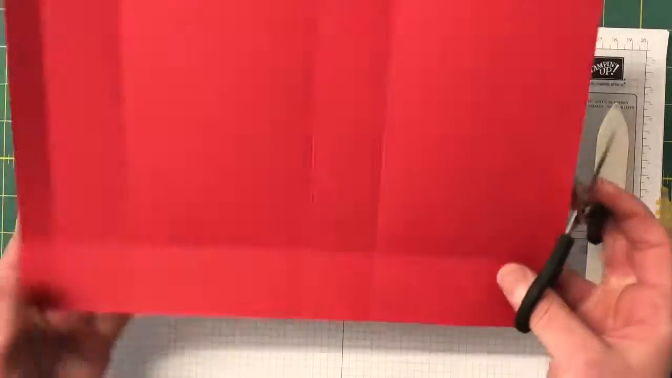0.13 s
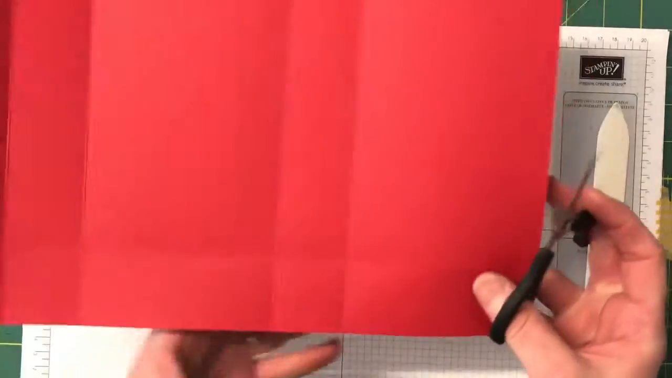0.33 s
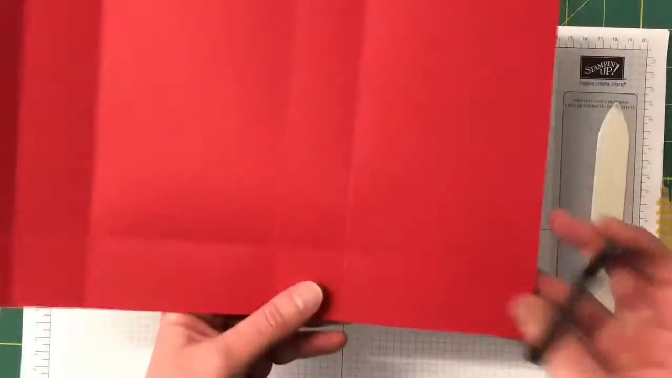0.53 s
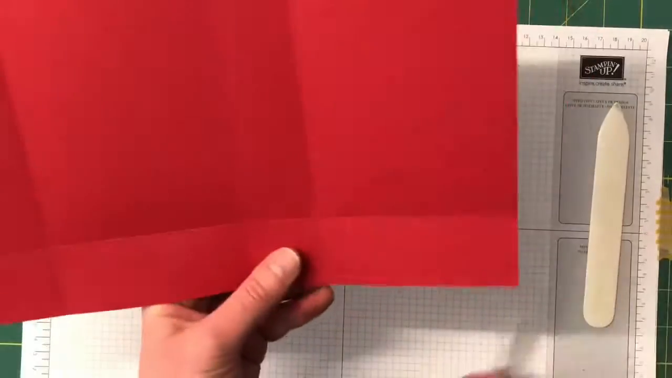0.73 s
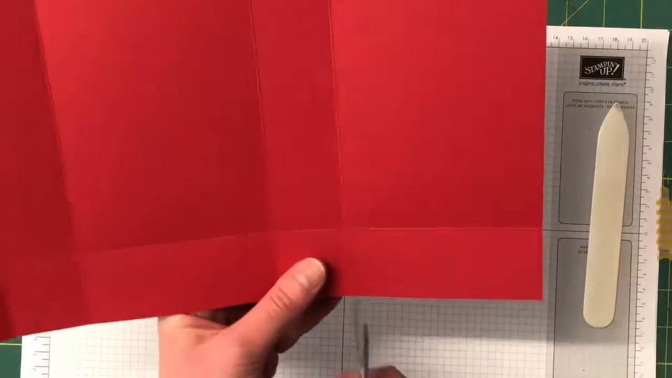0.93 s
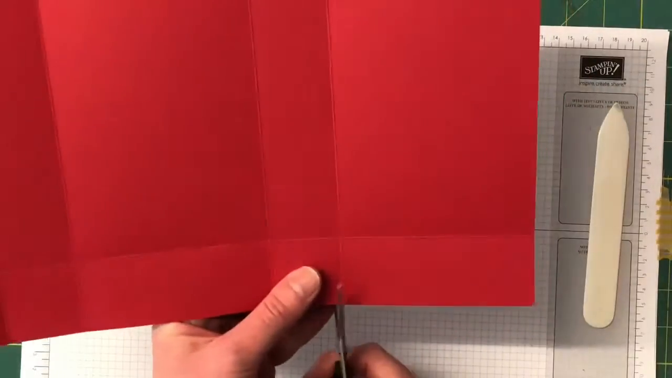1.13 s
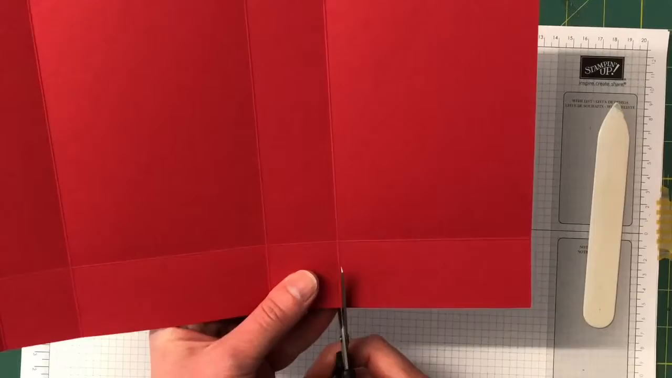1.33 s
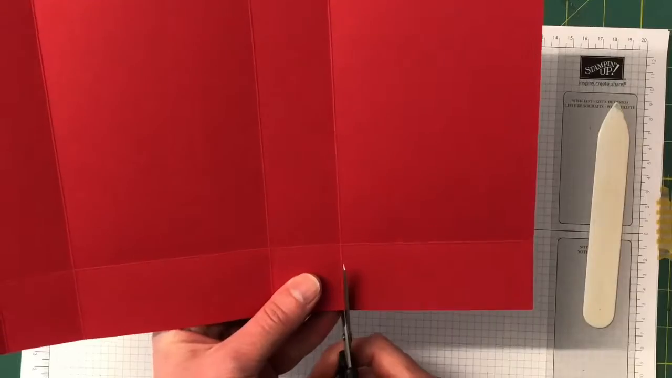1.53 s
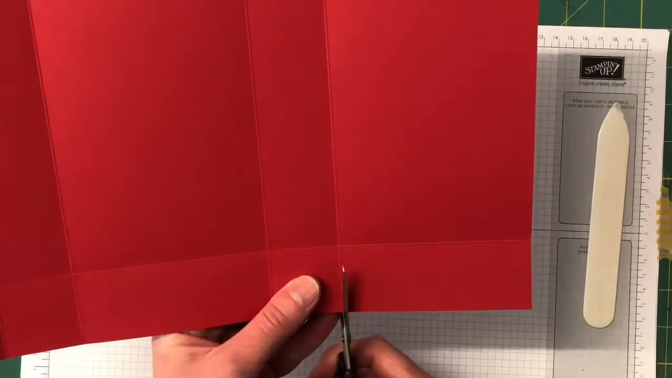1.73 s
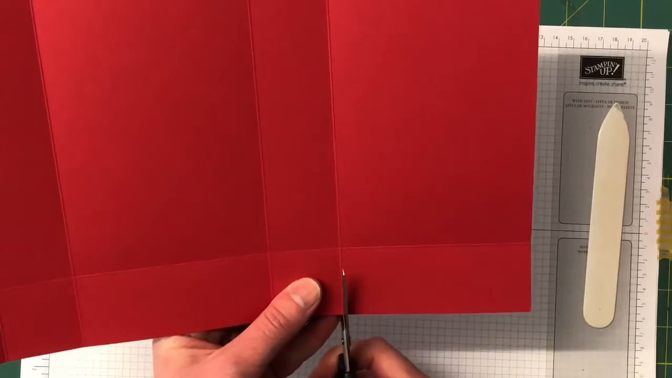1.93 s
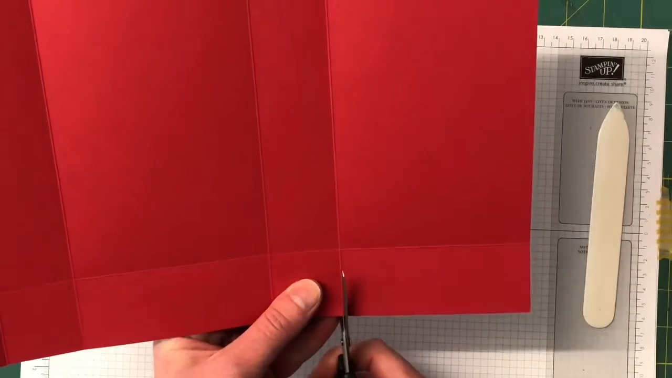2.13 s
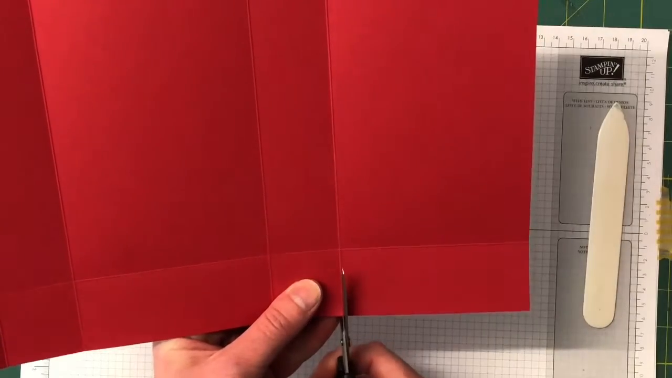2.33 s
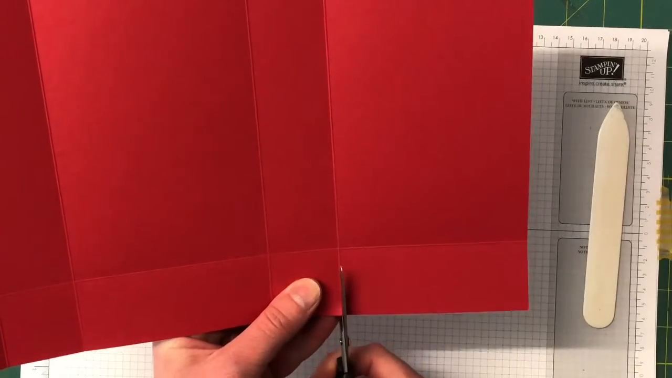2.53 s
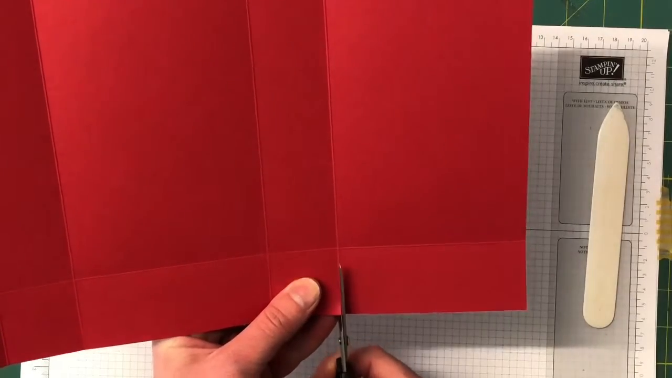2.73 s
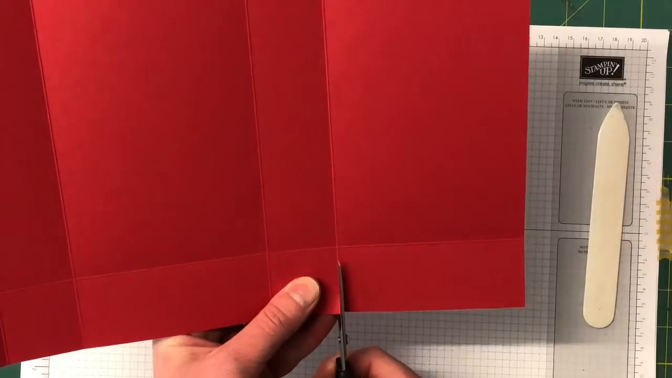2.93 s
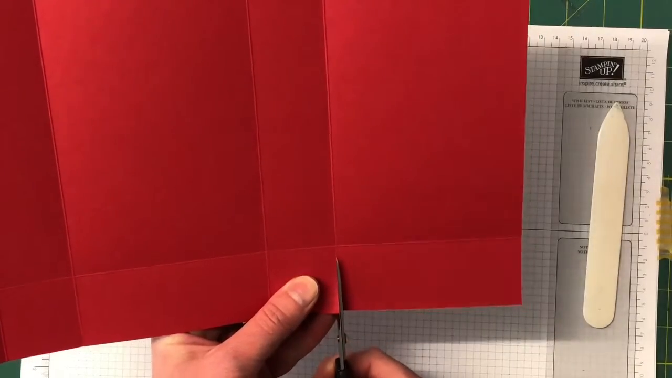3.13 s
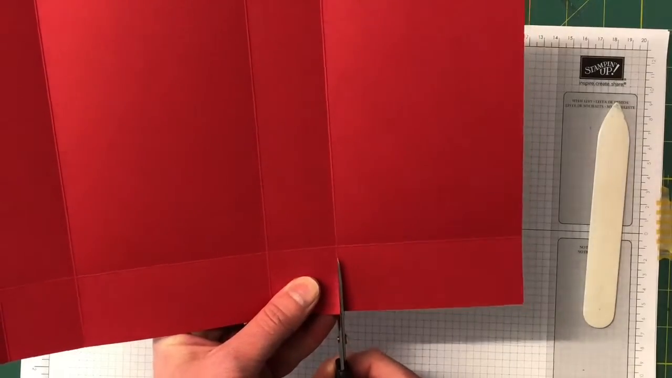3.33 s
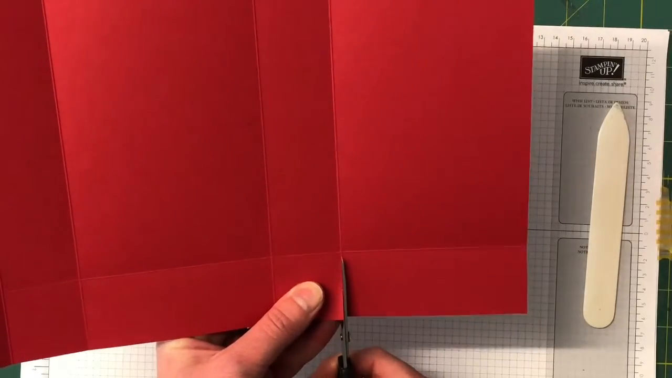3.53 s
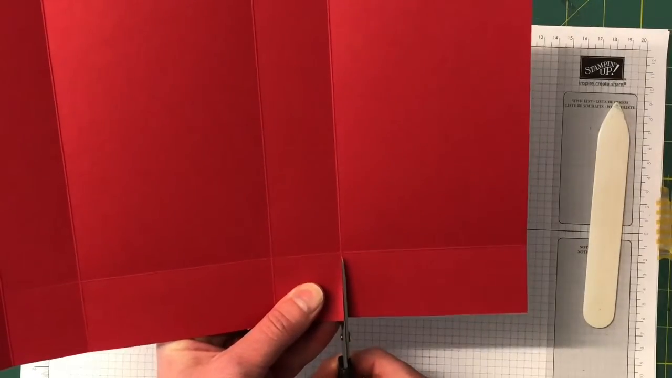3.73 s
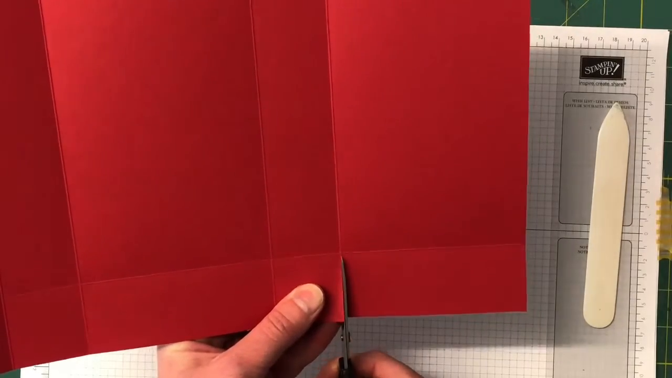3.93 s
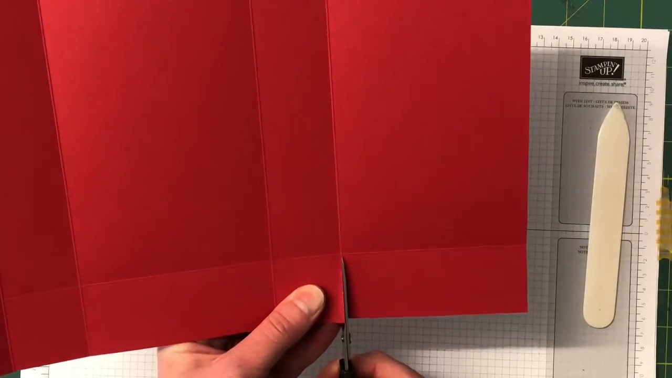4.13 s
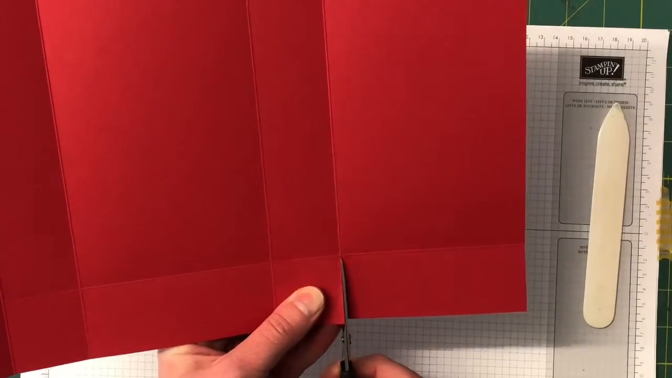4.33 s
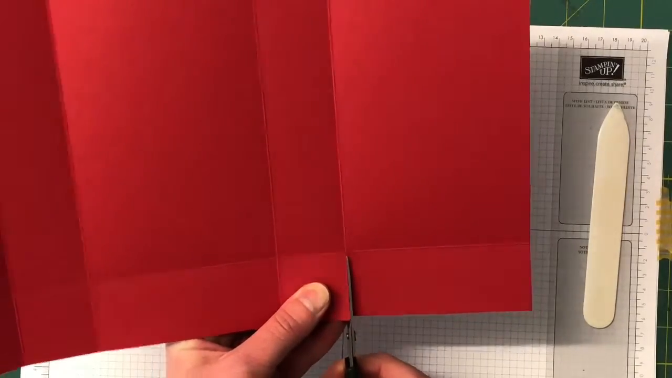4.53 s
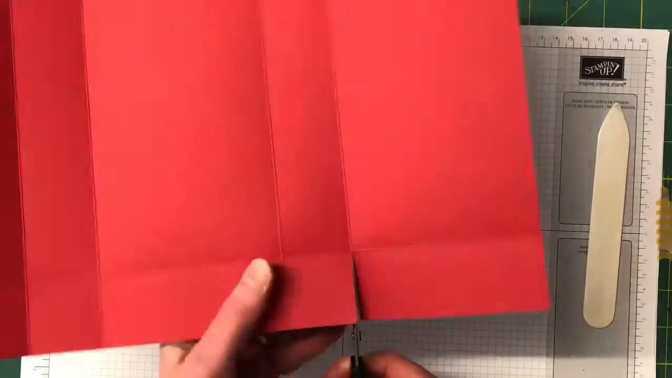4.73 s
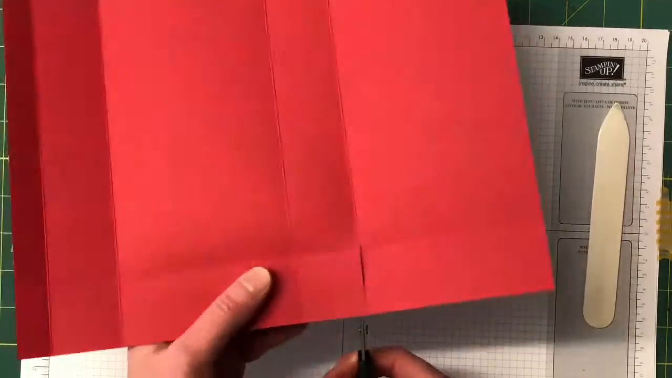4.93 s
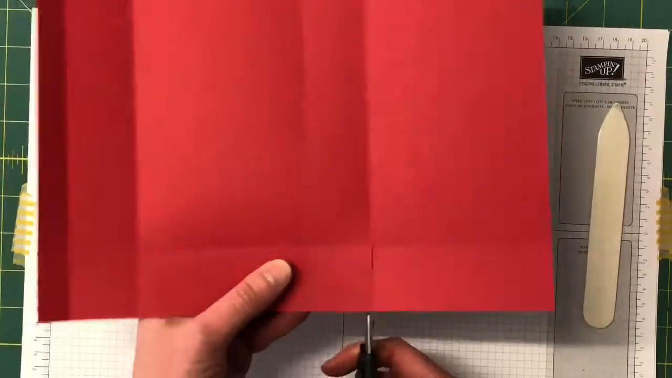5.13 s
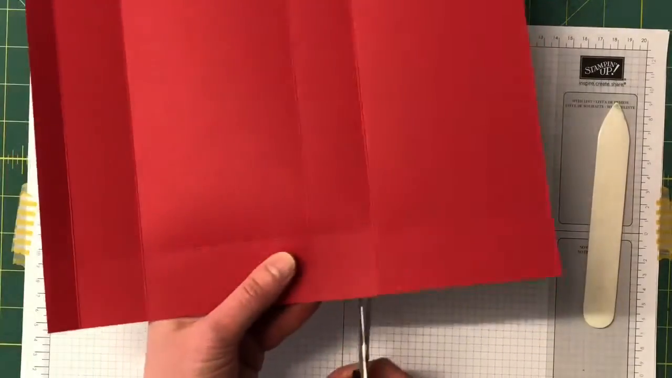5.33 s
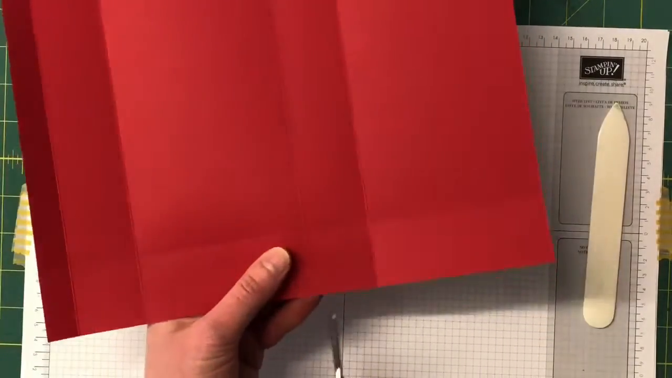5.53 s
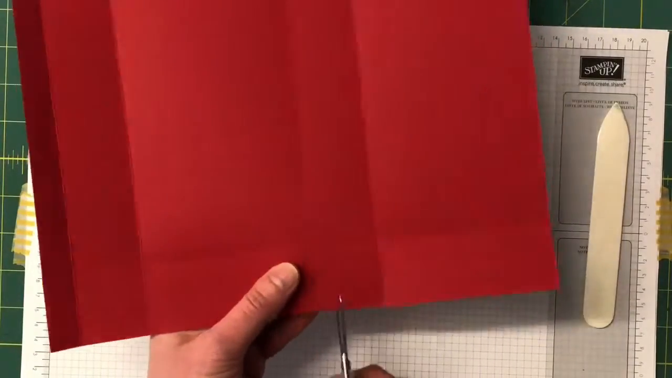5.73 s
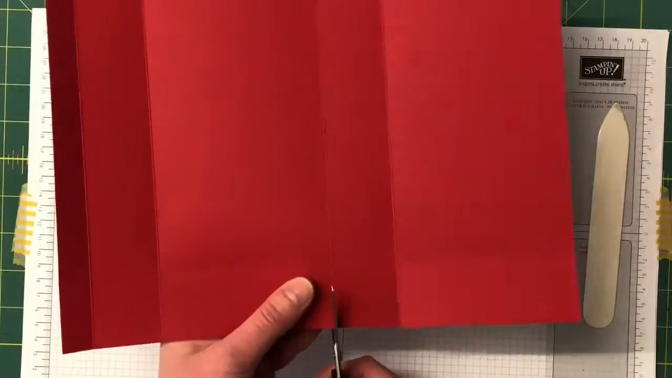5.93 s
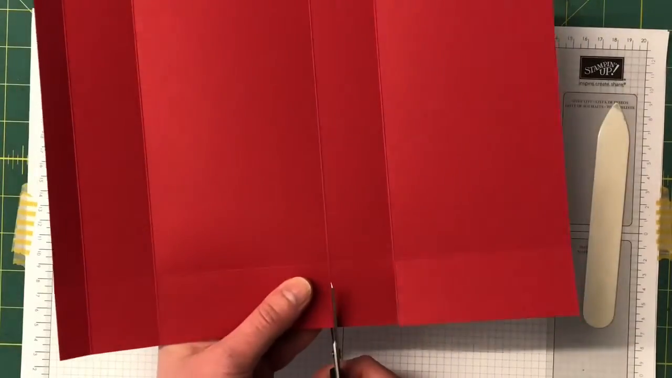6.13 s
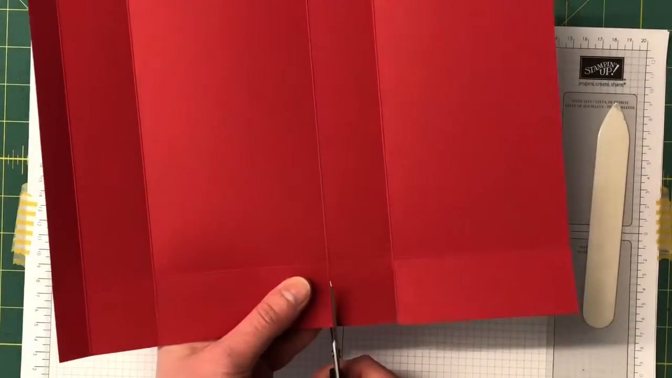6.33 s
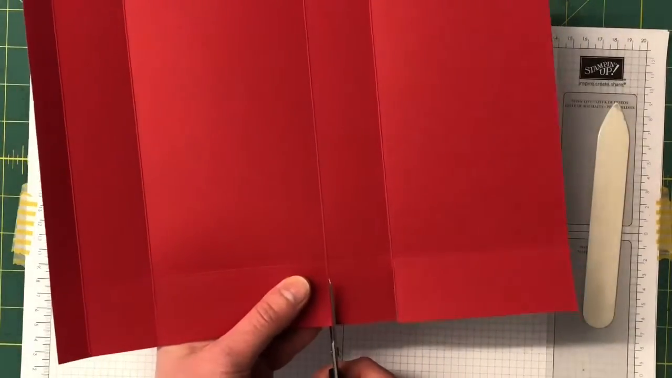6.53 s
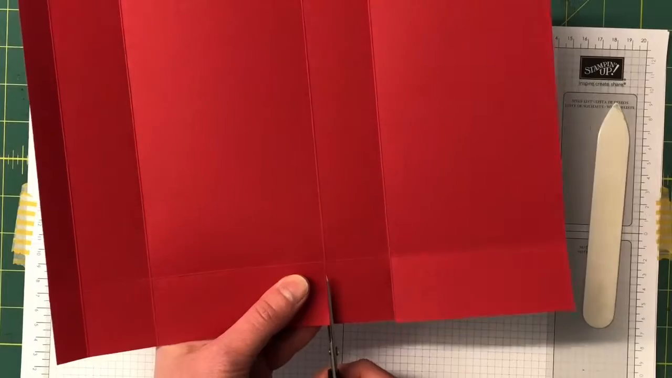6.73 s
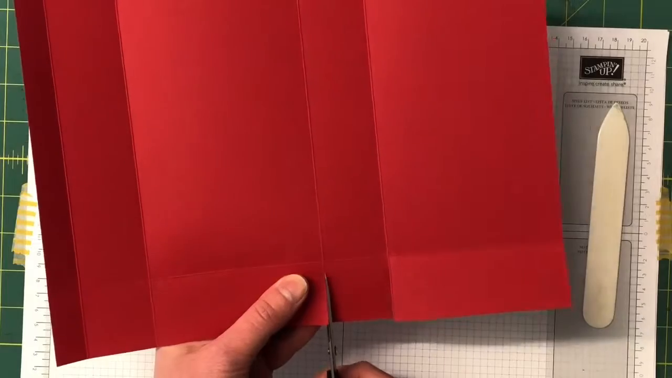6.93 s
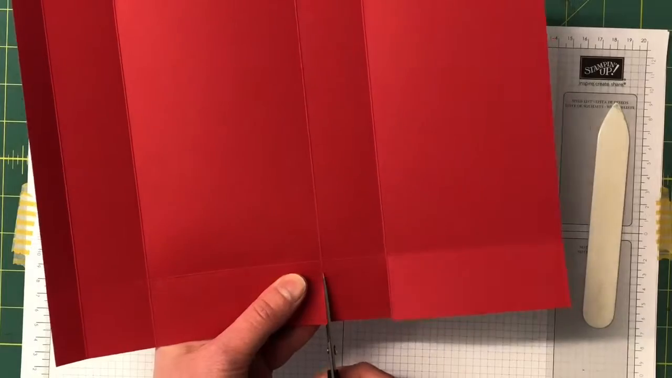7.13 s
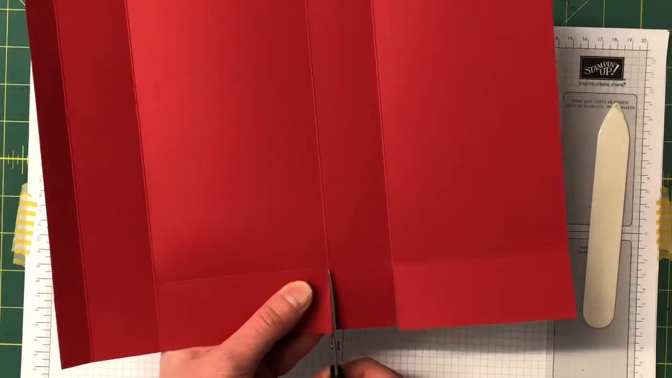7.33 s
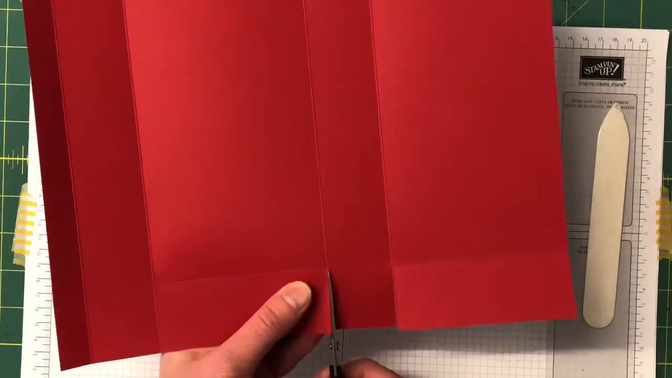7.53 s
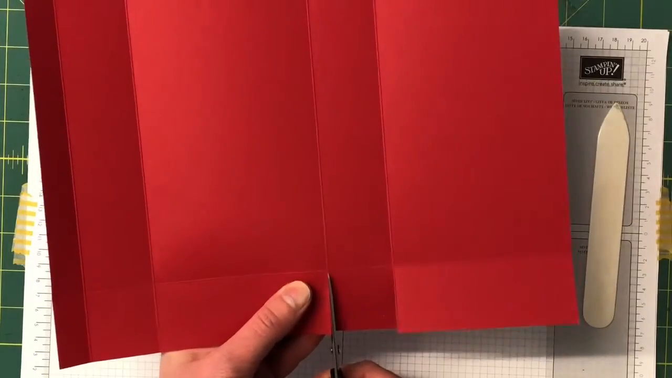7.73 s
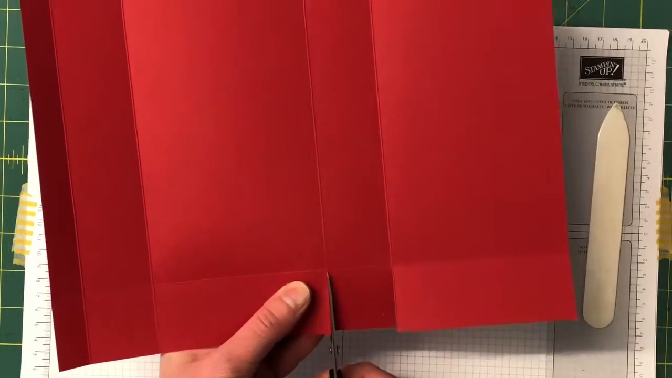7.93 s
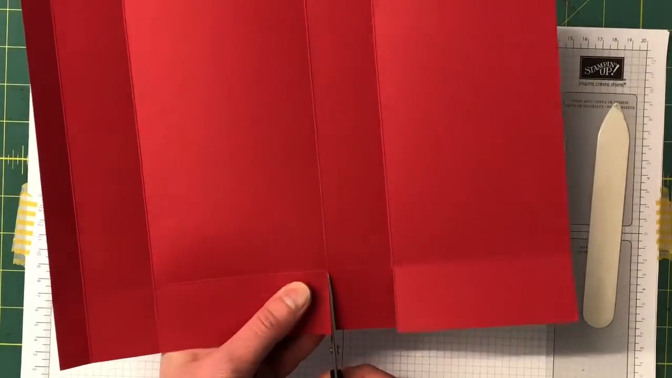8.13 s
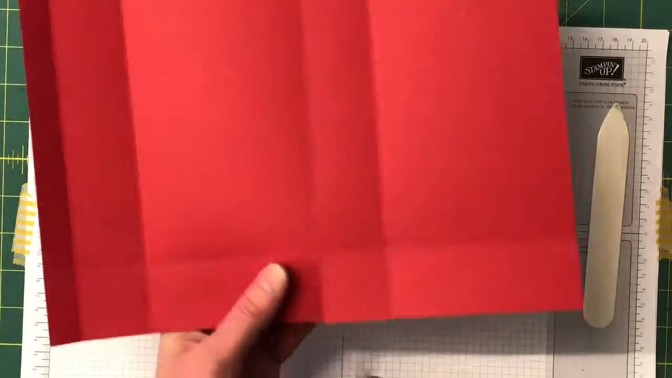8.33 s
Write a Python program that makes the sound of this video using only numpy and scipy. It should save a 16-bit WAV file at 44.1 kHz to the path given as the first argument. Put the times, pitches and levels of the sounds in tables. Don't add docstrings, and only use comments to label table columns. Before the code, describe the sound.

Close, dry handling of stiff card, then small scissors crunching slowly through it in two places, blades sliding open between short crisp snips.

```python
import sys
import numpy as np
from scipy import signal
from scipy.fft import rfft, irfft
from scipy.io import wavfile

SR = 44100
rng = np.random.default_rng(int(sys.argv[2]) if len(sys.argv) > 2 else 0)


def makeup_ratio(level_db):
    decades = np.asarray(level_db, float) / 20
    return 10 ** decades


def output_pcm(signal):
    pcm = np.clip(np.atleast_2d(signal).T, -1, 1) * 32767
    wavfile.write(sys.argv[1], SR, np.round(pcm).astype(np.int16))


N = 369116


def rms_one(x):
    return x / np.sqrt(np.mean(x ** 2) + 1e-20)


def band(x, low_hz, high_hz):
    edges_hz = [low_hz, min(high_hz, .45 * SR)]
    return signal.sosfilt(signal.butter(2, edges_hz, "band", fs=SR, output="sos"), x)


def resonate(x, peaks):
    out = 0
    for k, (hz, width_hz, level_db) in enumerate(peaks):
        r = np.exp(-np.pi * width_hz / SR)
        b = [(1 - r * r) / 2, 0, (r * r - 1) / 2]
        a = [1, -2 * r * np.cos(2 * np.pi * hz / SR), r * r]
        out = out + (-1) ** k * makeup_ratio(level_db) * signal.lfilter(b, a, x + 1e-18)
    return out


def drift(rate_hz):
    r = np.exp(-2 * np.pi * rate_hz / SR)
    noise = rng.standard_normal(N + SR)
    return rms_one(signal.lfilter([1], [1, -2 * r, r * r], noise)[SR:])


def strokes(tables, attack_s=0.0113, release_s=.015):
    t = np.arange(N) / SR
    out = np.zeros((len(tables[0][0]) - 1, N))
    for rows in tables:
        s, *columns = np.transpose(rows)
        span = slice(*np.searchsorted(t, [s[0] - attack_s, s[-1] + release_s]))
        onset = .5 + (t[span] - s[0]) / attack_s
        ending = 1 + (s[-1] - t[span]) / release_s
        inside = np.clip(np.minimum(onset, ending), 0, 1) ** 2
        levels_db = np.array([np.interp(t[span], s, c) for c in columns])
        out[:, span] += inside * makeup_ratio(levels_db)
    return out


def shared_out(level_db, brightness_db, sheet_db, edge_db):
    edge_follows = 1.41
    sheet = level_db + sheet_db - brightness_db
    return level_db, sheet, level_db + edge_db + edge_follows * brightness_db


def rubbing(touch, rows, curves=()):
    brightens_db = -0.5
    sheet_db, edge_db, attack_s, release_s = touch
    straight = [[(s, start_db, bright - brightens_db / 2), (s + length, end_db, bright + brightens_db / 2)]
                for s, length, start_db, end_db, bright in rows]
    tables = [[(s, *shared_out(db, bright, sheet_db, edge_db)) for s, db, bright in curve]
              for curve in straight + list(curves)]
    return strokes(tables, attack_s, release_s)


def drag():
    # (time [s], pressure [dB], brightness [dB])
    cuts = [
        [(2.3, -73, -4), (2.514, -71, -5.5), (2.926, -67.5, 0), (3.122, -57.5, -2), (3.24, -55, 3),
         (3.32, -69, -7)],
        [(6.44, -76, -5), (6.515, -70, -5), (6.53, -59, -7), (6.568, -65.5, -6.5), (6.7, -61.5, -2.5),
         (7.014, -55.5, -3.5), (7.14, -53.5, 3.5), (7.18, -65, -6.5)],
    ]
    # (start [s], length [s], start level [dB], end level [dB], brightness [dB])
    snips = [
        (.057, 0.07, -51, -61.5, -19),
        (3.888, .135, -59, -53, -3),
        (4.378, 0.035, -41.5, -80.5, -6),
        (7.999, .04, -56, -56, 2),
    ]
    openings = [(3.416, 0.1308, -49.5, -54.5, 1), (4.702, 0.0593, -53.5, -52, 3.5),
                (4.771, 0.218, -49.5, -59, 3), (7.302, .058, -47, -45, 4), (7.37, .025, -46, -52, 4),
                (7.568, .04, -56, -54, 1), (7.762, 0.07, -51, -56.5, -1), (8.038, 0.042, -42, -55, 0.5),
                (8.269, 0.0904, -49.5, -42.5, 4)]
    fingers = [(0.0, 0.033, -54.5, -73, -2.5), (.105, 0.0792, -47.5, -55, -4.5),
               (0.194, 0.0297, -54.5, -60.5, 7.5), (0.454, 0.0328, -51, -64, -3),
               (0.491, .07, -58, -51, -8), (0.564, 0.1186, -57.5, -57, 6),
               (0.999, 0.357, -73.5, -77.5, -0.5), (0.725, 0.259, -60, -71.5, -2),
               (1.42, .08, -67.5, -70, -8), (3.605, .015, -60, -63.5, -2), (3.668, .025, -57, -60, -2),
               (4.41, 0.104, -70, -75, 4.5), (4.533, 0.165, -62.5, -67, -5.5),
               (5.083, 0.0323, -57, -59, 4.5), (5.122, 0.0729, -59, -59, -9),
               (5.209, 0.0852, -52, -46, -4.5), (5.301, 0.0705, -48.5, -60, -0.5),
               (5.37, .09, -46, -50, -1), (5.474, 0.0294, -50, -47, -5), (5.531, 0.054, -72, -73.5, -1)]
    # (sheet dB, edge dB against the blades at brightness 0, attack s, release s)
    finger_touch = (-7, -11.5, 0.0839, 0.0288)
    opening_touch = (-8, -12, .009, .022)
    cutting_touch = (-7, -11, 0.0022, 0.0058)

    clumps = makeup_ratio(2.2 * drift(60) + 2.5 * drift(500))
    slides = rubbing(finger_touch, fingers) * makeup_ratio(.7 * drift(12.8)) + rubbing(opening_touch, openings)
    gains = slides * makeup_ratio(0.394 * drift(40)) + rubbing(cutting_touch, snips, cuts) * clumps
    return gains * rng.standard_normal((3, N))


def breaks():
    # (time [s], peak [dB], brightness [dB], swell [ms])
    cut_breaks = [(2.454, -48.5, 2.5, 2.4), (2.6135, -52, 0, 2.2), (2.79, -50, 0, 2.2),
                  (2.8477, -50.5, 2.5, 1.8), (2.886, -50.5, 1.5, 1.8), (2.918, -50, 3, 2.2),
                  (2.9387, -47, 0, 3.1), (2.967, -46, -1, 2.8), (3.0654, -45, 0, 5.1),
                  (3.1028, -44, 2.5, 2.2), (3.1461, -41.5, 0, 4.9), (3.1709, -45.5, 1, 2.2),
                  (3.1956, -49, 3, 2.5), (3.2211, -35, 0.5, 2.5), (3.2389, -37, 0, 2.5),
                  (3.254, -43, 3.5, 3.4), (3.277, -43.5, -5, 2.2), (3.2945, -36, 4, 2.2),
                  (3.906, -38, 0, 3.5), (3.9265, -35, 1, 6.5), (3.953, -37, 0, 4.5),
                  (3.9775, -32, 2, 4.2), (3.9995, -30, 3, 2.4), (4.3833, -32, -6, 2.5),
                  (4.388, -27, 7, 3.2),
                  (6.696, -45.5, 4.5, 2.2), (6.771, -44.5, 0.5, 2.5), (6.8443, -44, 3, 4.8),
                     (6.8762, -50.5, -11, 3.3), (6.983, -46, 0, 3.5), (7.005, -38, -5, 4.5),
                     (7.033, -38, -3, 5.2), (7.0592, -41, 0, 4.2), (7.0984, -38, 1, 4.5),
                     (7.122, -30, 1, 4.2), (7.167, -45, 8, 3.1), (7.3, -48, 5, 2.8), (7.5422, -57, 0, 3.5),
                     (7.579, -38, 0, 3.2), (7.5944, -44, -2, 3.2), (7.9975, -33, 2, 2.5),
                     (8.0135, -30, 4, 3.8), (8.0315, -28, 2, 4.2), (8.0955, -30, 4, 1.6),
                     (8.106, -32, 6, 1.5), (8.1245, -27, -3, 2.2), (8.3614, -27.5, 2, 2.2),
                     (6.664, -46, 3, 4.5), (6.805, -46, 3, 2.8), (6.916, -46, 0, 3.5), (7.612, -52, 5, 1.8)]
    # (time [s], peak [dB], brightness [dB])
    handling_breaks = [(0.0701, -31, -7.5), (0.2885, -53.5, -4.5), (0.456, -47.5, 2.5),
                       (0.5044, -42, -10.5), (0.5265, -41, -4.5), (0.544, -35, -5), (0.6864, -30.5, -0.5),
                       (2.0539, -50, -1.5), (4.5386, -50.5, 7.5), (4.6327, -47, -5), (4.7631, -40, -1),
                       (4.774, -35, 9.5), (5.0912, -54, 3.5), (5.3149, -39.5, 0.5), (5.3807, -47.5, 16),
                       (5.7505, -49, -2.5), (6.119, -54, -5.5)]
    handling_swell_ms = 1.6
    sheet_db, edge_db = -3, -17.5

    out = np.zeros((3, N + 2000))
    t_ms = np.arange(2000) / SR * 1000
    rows = [(*row, handling_swell_ms) for row in handling_breaks] + cut_breaks
    chance = rng.standard_normal((len(rows), 2, 2000))
    for (s, peak_db, bright, swell_ms), (noise, size) in zip(rows, chance):
        gains = makeup_ratio(np.array(shared_out(peak_db, bright, sheet_db, edge_db)))[:, None]
        x = t_ms / max(swell_ms, .1)
        clicks = noise * makeup_ratio(1.78 * size)
        out[:, round(s * SR):][:, :2000] += gains * clicks * x ** 2 * np.exp(1 - 2 * x)
    return out[:, :N]


def lifted(x, peaks, patchy_db, rate_hz):
    for hz, width_hz, lift_db in peaks:
        lift = makeup_ratio(lift_db + patchy_db * drift(rate_hz)) - 1
        upper = .5 + .5 * np.tanh(2 * drift(rate_hz))
        above = resonate(x * lift * upper, [(1.025 * hz, width_hz, 0)])
        below = resonate(x * lift * (1 - upper), [(.975 * hz, width_hz, 0)])
        x = x + above + below
    return x


def off_the_table(x):
    lag = SR / 1000 * (1.9 + .25 * drift(2.5))
    return x + .45 * np.interp(np.arange(N) - lag, np.arange(N), x)


def scissors_and_card(drives):
    # (frequency [Hz], width [Hz], lift [dB])
    first_peaks = [(2796, 310, 8), (3553, 240, 6), (4623, 134, 6.5), (4943, 160, 6), (5813, 102, 7.5),
                   (6420, 118, 8.5), (8420, 260, 0.5), (6000, 1760, 5), (14000, 1900, 4.5),
                   (10500, 2500, -4)]
    second_peaks = [(2204, 214, 9.8), (2777, 189, 8.83), (3387, 225, 8.37), (4090, 97, 3.06),
                    (5120, 340, 10.5), (6960, 250, 5.6), (8700, 160, 3.4), (13600, 1540, 4),
                    (10000, 1800, -4), (6100, 500, -5)]
    loose_peaks = [(1165, 61, 1.86), (1540, 130, 2.46), (2313, 264, 5.1), (2965, 294, 5.02),
                   (3560, 400, 2.6), (5215, 170, 4.54), (6700, 190, 3.75), (9010, 91, 1.15)]
    # (frequency [Hz], width [Hz], level [dB])
    sheet_modes = [(413, 66, -5.5), (588.2, 110.5, 2), (816.4, 195, 0.5), (1054.3, 647, -3)]

    t = np.arange(N) / SR
    first = (t > 2.2) & (t < 4.6)
    second = t > 6.3
    blades, sheet, edge = drives
    bright = band(blades, 1500, 7500) - makeup_ratio(4) * band(edge, 7500, 18000)
    gripped = lifted(bright * first, first_peaks, 2.0, 14) + lifted(bright * second, second_peaks, 2.0, 14)
    free = lifted(bright * ~(first | second), loose_peaks, 3.5, 14)
    body = band(resonate(sheet, sheet_modes) + 0.1885 * sheet, 411, 1872)
    return off_the_table(makeup_ratio(-5.0) * gripped + makeup_ratio(-0.5) * free) + makeup_ratio(16) * body


def snaps():
    snap_times = [.0557, .0988, .6868, 4.3979, 4.6966, 4.7635, 5.5018, 8.1188]
    # (crack [dB], crack [Hz], sheet ring [Hz], ring [dB], rattle [dB])
    snap_rows = [
        (-13, 4600, 729, -28, -22),
        (-17.5, 3380, 904, -31.5, -22.5),
        (-56, 3600, 401, -29.5, -34.5),
        (-26.5, 2800, 360, -35.5, -21.5),
        (-23.5, 1250, 996, -28, -33.5),
        (-50.5, 2500, 500, -29.5, -41.5),
        (-20.5, 3010, 607, -35.5, -57.5),
        (-16.5, 2700, 916.4, -16.5, -23),
    ]
    # (frequency [Hz], level [dB], T60 [s])
    shut_modes = [(2230, -21.5, 0.0059), (2786, -13.5, 0.0069), (3615, -15.5, 0.00723),
                  (4167, -15.5, 0.0068), (5180, -24, .006)]
    table_echo_ms = .5

    out = np.zeros(N + 4000)
    t = np.arange(4000) / SR
    noises = rng.standard_normal((len(snap_rows), 4000))
    for s, row, noise in zip(snap_times, snap_rows, noises):
        crack_db, crack_hz, ring_hz, ring_db, rattle_db = row
        crack = -makeup_ratio(crack_db) * np.sin(2 * np.pi * crack_hz * t) * np.exp(-t / .00018)
        crack += .7 * np.roll(crack, round(table_echo_ms * SR / 1000))
        ring_shape = np.exp(-t / .0025) * (1 - np.exp(-t / .0007))
        ring = makeup_ratio(ring_db) * np.sin(2 * np.pi * ring_hz * t) * ring_shape
        rattle_shape = np.exp(-t / .003) + .12 * np.exp(-t / .02)
        rattle = makeup_ratio(rattle_db) * band(noise * rattle_shape, 900, 8000)
        out[round(s * SR):][:4000] += crack + ring + rattle
    shut = sum((-1) ** k * makeup_ratio(db - 60 * t / t60_s) * np.sin(2 * np.pi * hz * t)
               for k, (hz, db, t60_s) in enumerate(shut_modes))
    out[round(snap_times[-1] * SR):][:4000] += shut
    return out[:N]


def flex():
    # (start [s], rise [s], fall [s], deep boom [dB], upper boom [dB])
    flex_rows = [(0.054, 0.0118, 0.157, -51, -38), (.29, .012, 0.0727, -54.5, -45),
                 (0.511, 0.0432, .06, -49, -43.5), (0.636, 0.0055, 0.0486, -50, -46.5),
                 (.685, 0.0093, 0.0425, -53.5, -47.5), (0.699, 0.0738, 0.083, -45.5, -46.5),
                 (.856, .008, 0.065, -45, -44), (4.389, 0.0162, 0.0606, -69.5, -41.5),
                 (5.498, 0.00324, 0.0413, -62.5, -42.5)]
    # (frequency [Hz], width [Hz], level [dB])
    boom_modes = [(215.2, 47.4, 3.5), (286.2, 76, 6), (406, 91.6, 4.5), (517.4, 13.3, 7), (606.4, 44, -2.5)]
    rise_db, fall_db = 11, 24.5

    curves = [[(s, deep_db - rise_db, upper_db - rise_db),
               (s + rise, deep_db, upper_db),
               (s + rise + fall, deep_db - fall_db, upper_db - fall_db)]
              for s, rise, fall, deep_db, upper_db in flex_rows]
    deep, upper = strokes(curves)
    lumps = rng.standard_normal(N) * makeup_ratio(2.0 * drift(26.2))
    low_body = rms_one(band(band(lumps, 77.6, 263.6), 67, 285))
    upper_body = rms_one(resonate(lumps, boom_modes) + .3 * band(lumps, 200, 800))
    return deep * low_body + upper * upper_body


def room(x):
    t60_s, dull_hz = 0.25, 3710
    t = np.arange(SR // 2) / SR
    noise = rng.standard_normal((2, len(t))) * (t > .005)
    lows = band(noise[0], 182, dull_hz) * makeup_ratio(-60 * t / t60_s)
    highs = band(noise[1], dull_hz, 24000) * makeup_ratio(-60 * t / (0.367 * t60_s))
    tail = lows + 1.614 * highs
    return signal.fftconvolve(x, tail / np.sqrt(np.sum(tail ** 2)))[:N] * 1.045


def room_tone():
    # (frequency [Hz], level [dB per Hz])
    air_spectrum = [(40, -16.5), (100, -8.5), (215, -3), (330, -10.5), (620, -18), (1220, -20.5),
                    (6400, -33.5), (16000, -37.5)]
    # (frequency [Hz], width [Hz], level [dB rms])
    fan_drones = [(54.13, 4.1, -73), (109.2, 15.4, -69.5), (150.9, 10, -75.5), (210.7, 55, -81.5)]
    air_db = -61.5

    hz, level_db = np.transpose(air_spectrum)
    bins_hz = np.maximum(np.arange(N // 2 + 1) * SR / N, 1)
    colour = makeup_ratio(np.interp(np.log(bins_hz), np.log(hz), level_db))
    air = irfft(rfft(rng.standard_normal(N)) * colour, N)
    white = rng.standard_normal(N)
    drones = sum(makeup_ratio(db) * rms_one(resonate(white, [(f, width_hz, 0)])) for f, width_hz, db in fan_drones)
    return makeup_ratio(air_db - 4.5) * rms_one(air) + drones


def scene():
    near = scissors_and_card(drag() + breaks()) + band(snaps(), 480, 20000) + flex()
    return (near + makeup_ratio(-14.5) * room(near) + room_tone())[None]


def band_limit(x):
    return signal.sosfilt(signal.butter(12, 16520, fs=SR, output="sos"), x)


def record(dry):
    # (frequency [Hz], width [Hz], level [dB])
    port_peak = [(15300, 600, -11)]
    low_cut = signal.butter(2, 38, "high", fs=SR, output="sos")
    top_cut = signal.cheby2(14, 40, 16050, fs=SR, output="sos")
    heard = signal.sosfilt(low_cut, dry + resonate(dry[0], port_peak))
    heard = signal.sosfilt(top_cut, heard)
    return band_limit(heard)


dry = scene()
out = record(dry)
output_pcm(out)
```